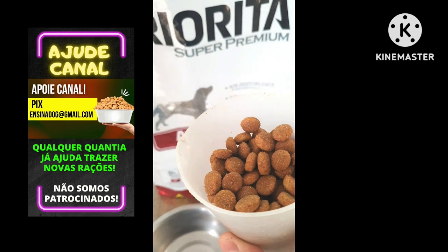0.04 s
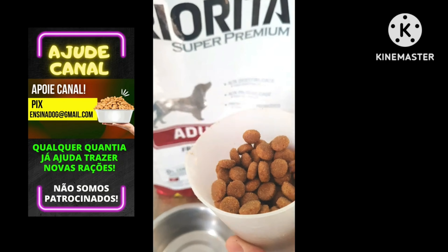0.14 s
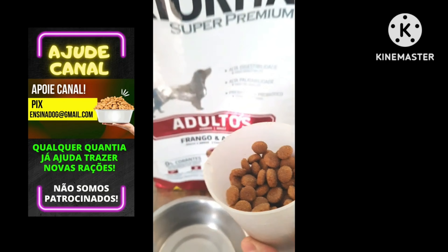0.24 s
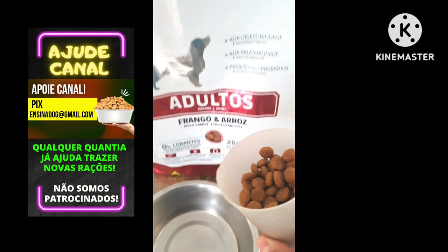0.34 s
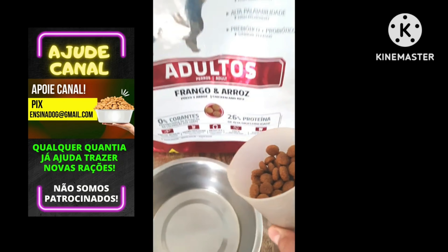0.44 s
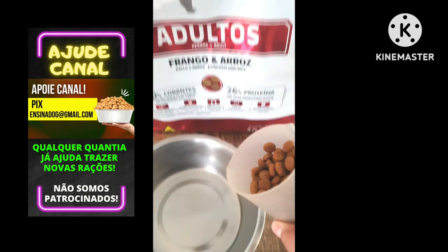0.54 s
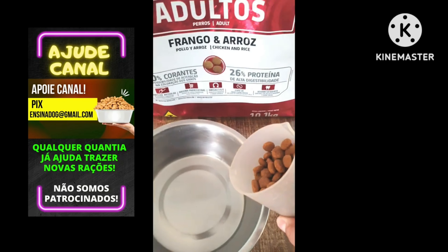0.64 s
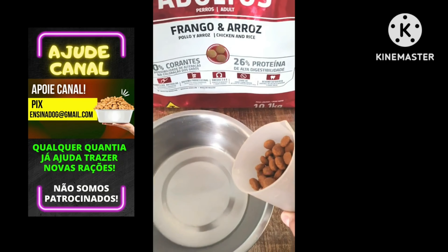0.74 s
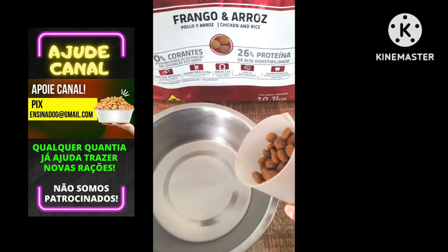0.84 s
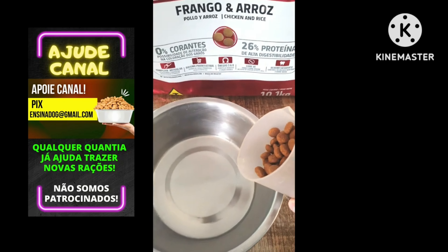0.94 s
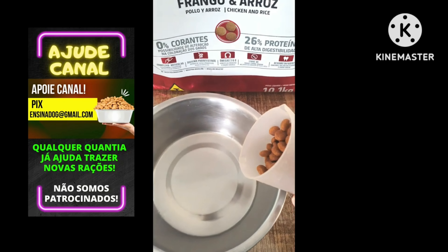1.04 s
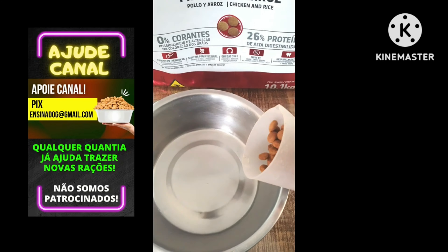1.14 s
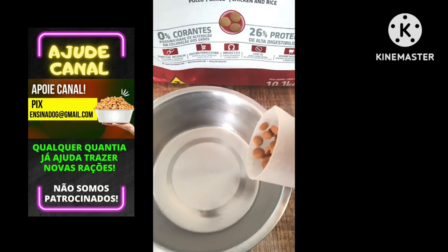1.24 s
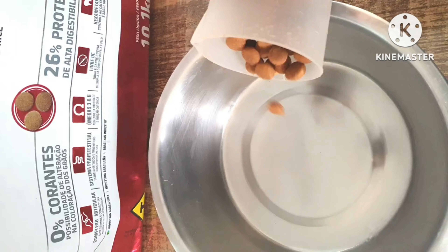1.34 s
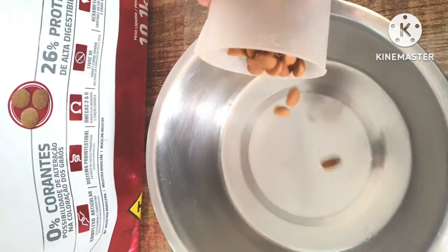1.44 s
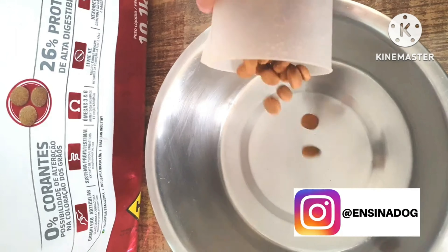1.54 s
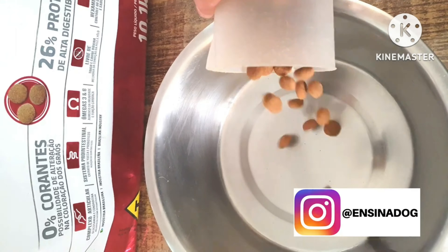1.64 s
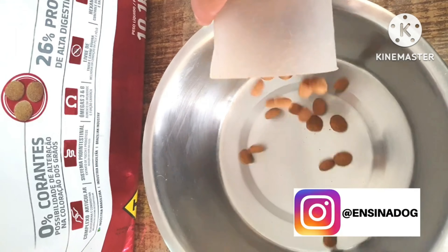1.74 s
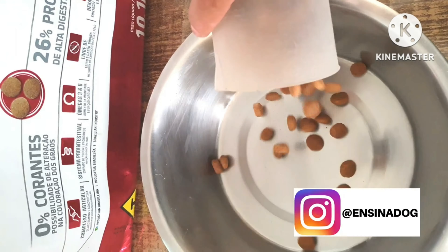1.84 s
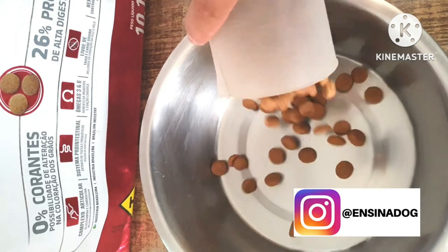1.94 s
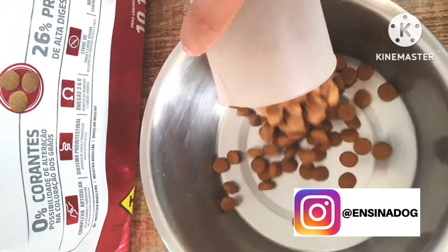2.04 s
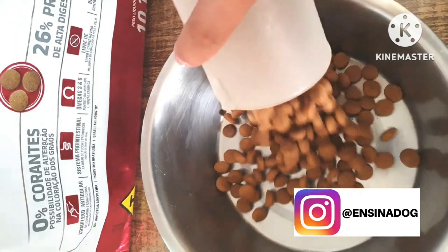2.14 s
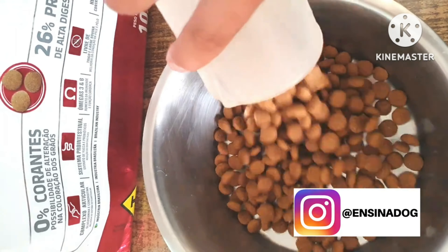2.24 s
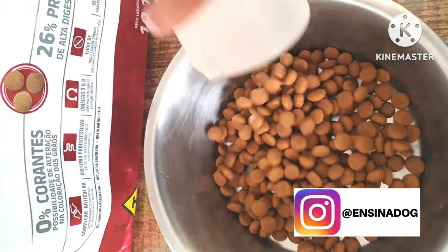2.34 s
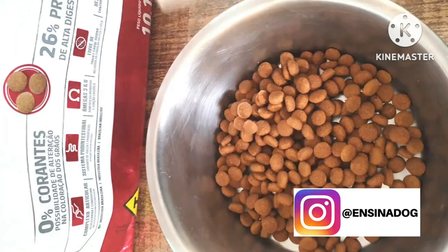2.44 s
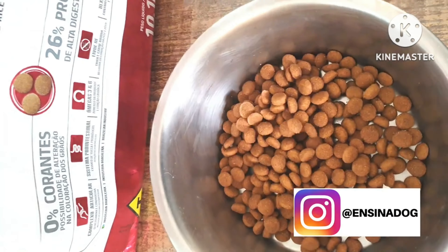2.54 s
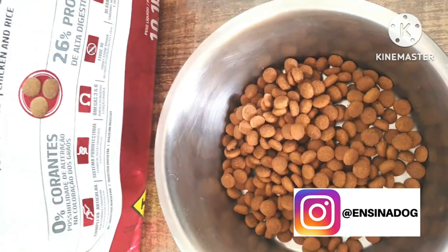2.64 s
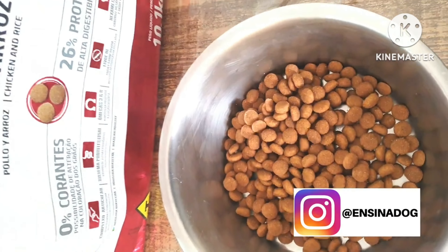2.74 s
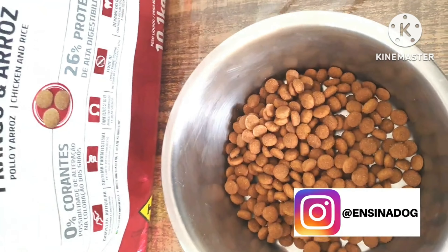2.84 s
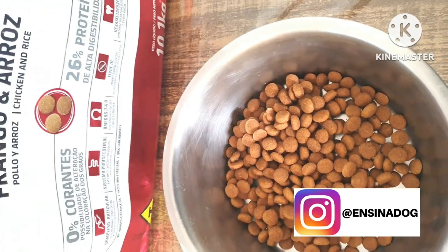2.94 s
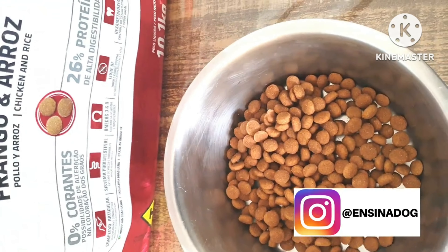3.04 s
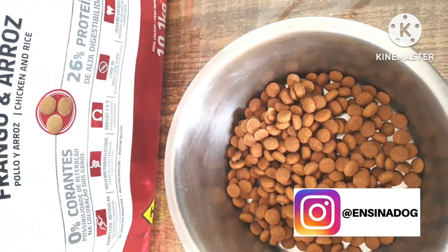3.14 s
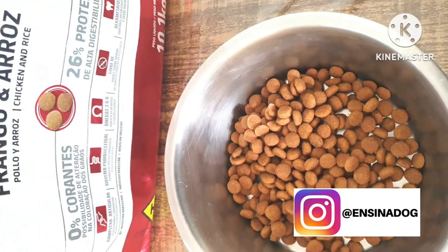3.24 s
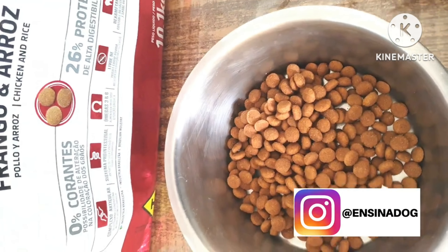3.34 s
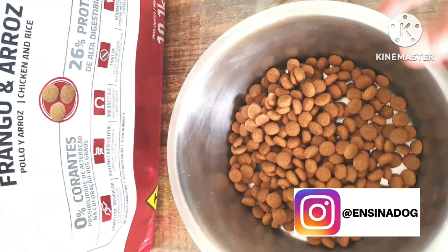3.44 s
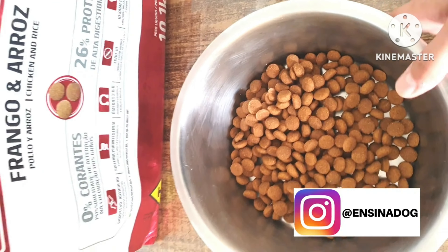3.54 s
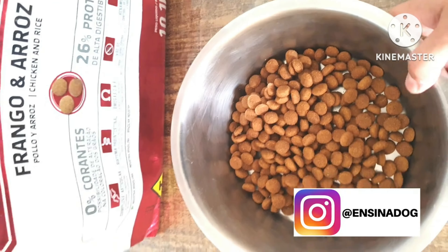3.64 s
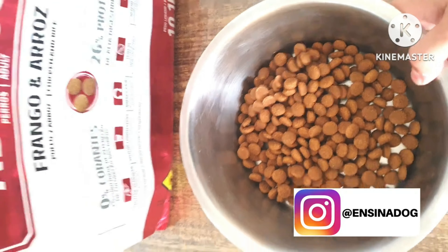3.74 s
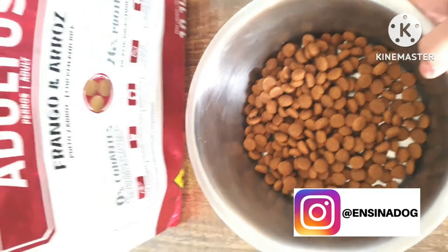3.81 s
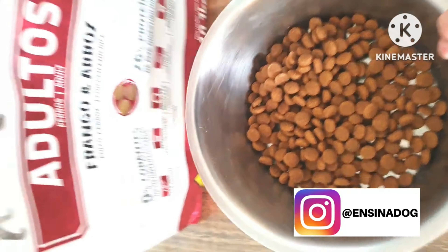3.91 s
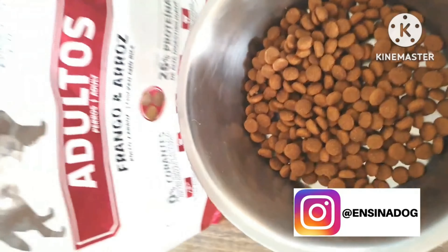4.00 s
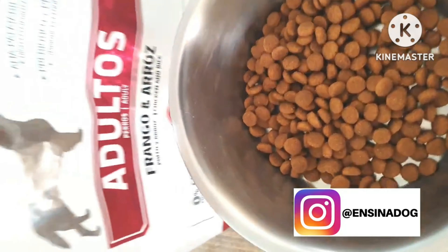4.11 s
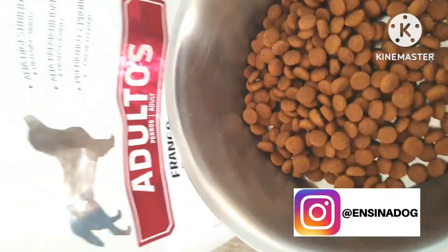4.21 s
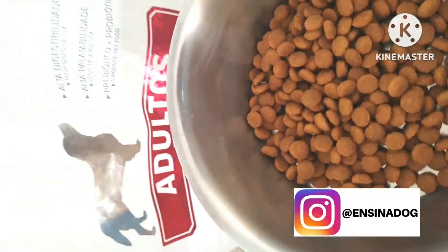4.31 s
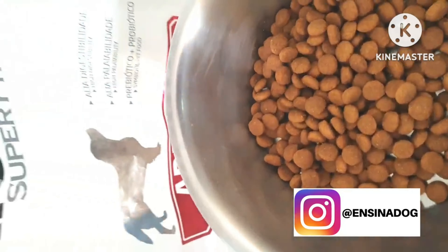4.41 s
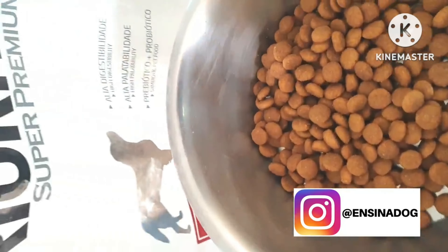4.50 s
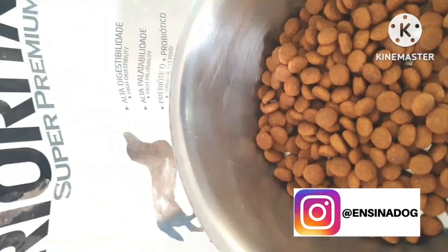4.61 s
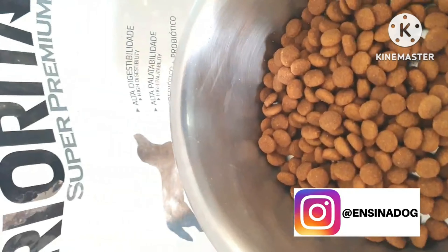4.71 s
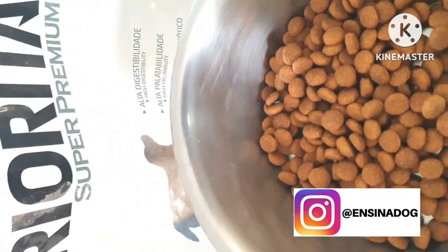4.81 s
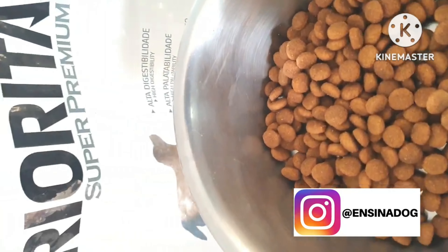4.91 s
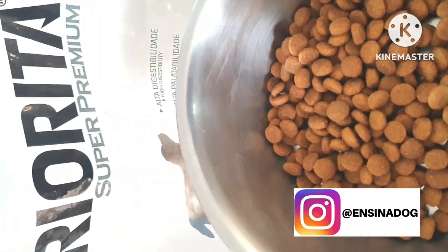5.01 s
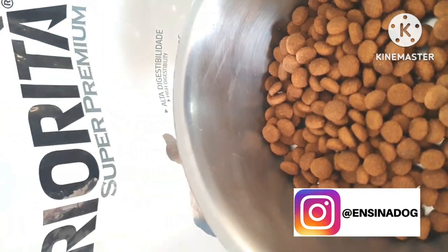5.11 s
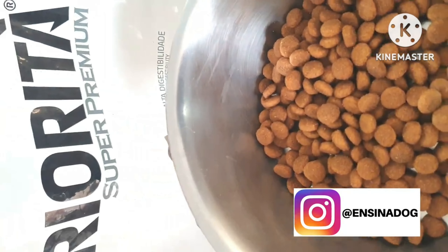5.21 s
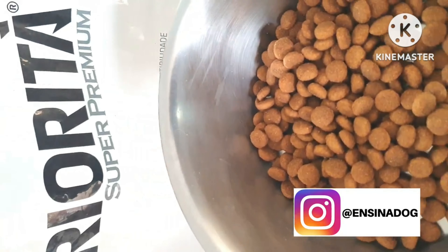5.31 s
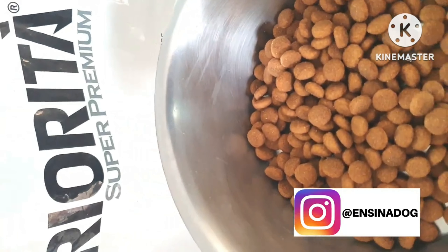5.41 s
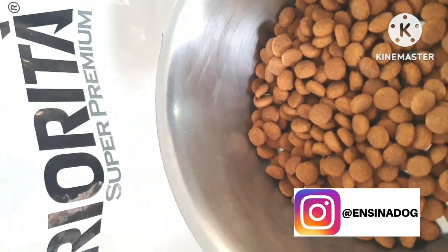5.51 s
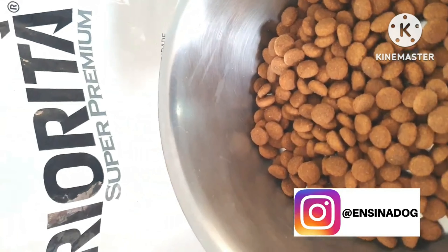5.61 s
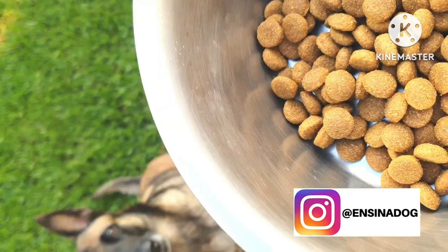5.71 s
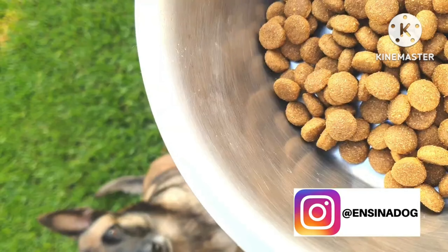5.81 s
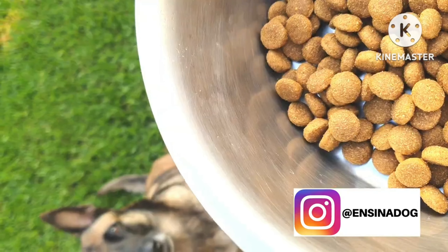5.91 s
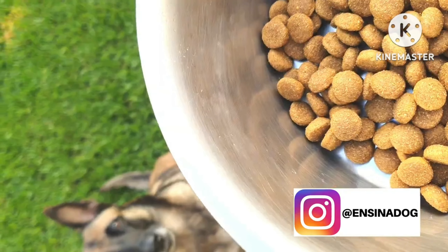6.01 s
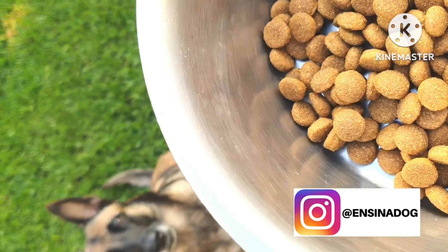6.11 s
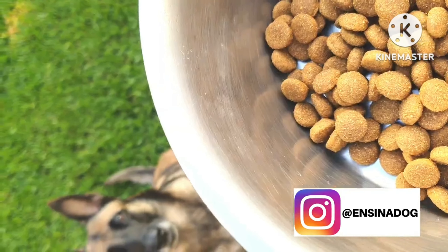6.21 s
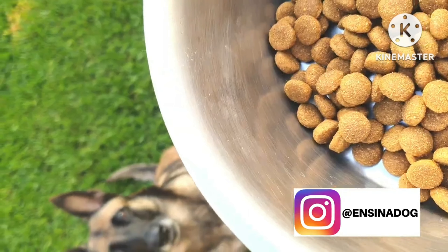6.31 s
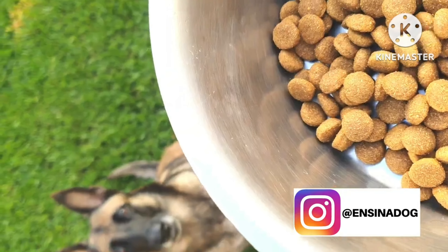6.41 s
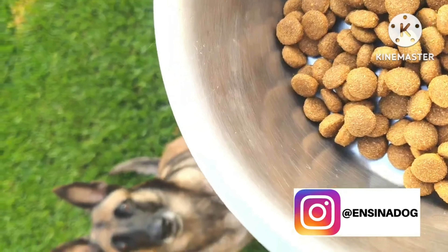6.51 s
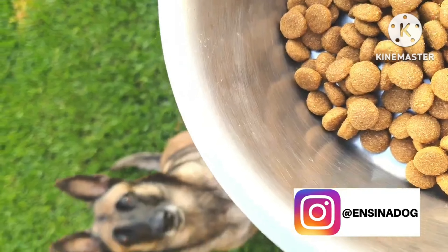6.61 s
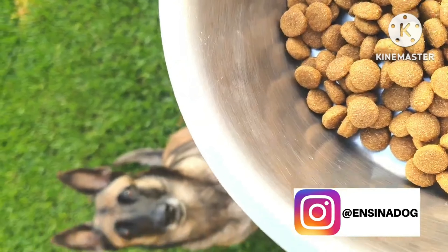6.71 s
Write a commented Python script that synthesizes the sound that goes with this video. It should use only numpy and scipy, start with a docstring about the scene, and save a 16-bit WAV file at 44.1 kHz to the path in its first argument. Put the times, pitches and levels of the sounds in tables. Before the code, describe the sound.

A sleeve swishes softly at about 0.3 seconds, and fingers start bumping the microphone, making low thumps and rumble on the right side that recur throughout. At 1.4 seconds dry dog food slides and ticks in a plastic scoop. From 1.6 seconds single pellets strike a steel bowl with bright, short, ringing clinks. They thicken into a rattling rush that peaks near 2.2 seconds, clacks on the growing heap and stops around 2.5. The pour is close, with slight room echo, clear on the left and muffled on the right. Two dull, echoing knocks sound a little way off at about 3.1 and 3.4 seconds. Handling bumps cluster from 3.6 to 5.6 seconds, while very faint, hollow tones rise and fall in the distance from 4 seconds on. Around 6.1 seconds, with a small click and two soft bumps, the low room hum changes to quiet garden air.

```python
"""A sleeve swishes, then dry pet food slides from a plastic scoop into a steel bowl. A few single pellets
make the steel ring; a short rush follows and clatters on the growing heap, and the room echoes.
Two dull knocks come next, then faint tones moan far off. At the end the air is a quiet garden's.
All along, the left microphone hears the scene openly; the right one is muffled by the hand that
holds the camera and thumps whenever the fingers shift."""
import sys
import numpy as np
from scipy import signal
from scipy.fft import rfft, irfft, next_fast_len
from scipy.io import wavfile

SR = 44100
rng = np.random.default_rng(int(sys.argv[2]) if len(sys.argv) > 2 else 0)


def wrap_up_sound(samples):
    """Save the sound to the file named by the first command line argument, as 16-bit audio."""
    columns = np.atleast_2d(samples).T
    # keep every value between -1 and 1, then stretch to whole-number steps
    tamed = np.clip(columns, -1, 1)
    steps = np.round(tamed * 32767).astype(np.int16)
    wavfile.write(sys.argv[1], SR, steps)


N = 297654
TIME = np.arange(N) / SR

# Levels in dB are relative. A ring time (t60) is how long a sound takes to fade by 60 dB.
# Single pellets hitting the steel. Each row: start in seconds, level in dB, then the extra
# drum of the bowl's floor, clink of its wall and high snap, each in dB.
SINGLE_PELLETS = [(1.572, -15, -3, 2.5, 3), (1.649, -15.5, -2, 0, 3), (1.688, -18.5, -4.5, 10, -6.5),
                  (1.699, -17.5, -2, 7.5, 3.5), (1.783, -14.5, -1, 1.5, 3.5), (1.827, -16.5, -0.5, 3, -2),
                  (1.852, -17.5, -4.5, -1, 1.5), (1.865, -17.5, 6, 1, -3), (1.91, -21.5, 4, 0.5, -3),
                  (1.952, -20, 3.5, 5, -10.5), (1.972, -18, -5, 0, 4.5), (1.998, -23, 4.5, -2, -0.5),
                  (2.014, -18.5, 2.5, 0.5, 4), (2.026, -20, -1.5, 0, 0), (2.067, -18, 0, 1, -1.5),
                  (2.091, -17, 1.5, -2, 3.5), (2.124, -16.5, 3.5, -0.5, 6.5), (2.214, -22.5, -0.5, 2, 10),
                  (2.358, -19.5, 1, 7, 0), (2.445, -31, 10, -12, -7)]
# The bowl's clear tones. Each row: pitch in Hz, level in dB, ring time in seconds.
BOWL_TONES = [(842, -13.5, 0.27), (1037, -3.5, 0.12), (1147, 6.5, 0.069), (1203, 1, 0.13), (1356, -8, .2),
              (1450, -7, 0.2483), (2132, -8.5, 0.37), (2450, 1, 0.067), (2476, 2, 0.087), (2550, -5, 0.1),
              (2806, -9, 0.15), (2932, -11, 0.22), (3320, -5.5, .18), (3770, -10, 0.4), (4250, -11, 0.072),
              (4820, -5, 0.16), (7840, -12, 0.1902), (8060, -15.5, 0.12), (8406, -17, .08),
              (8900, -13.5, 0.14)]
# The wooden table's low tones. Each row: pitch in Hz, level in dB, ring time in seconds.
WOOD_TONES = [(131, -24.5, 1.5), (251.7, -29, .9)]
# Pellets slipping in the scoop. Each row: start in seconds, level in dB.
SCOOP_SLIPS = [(1.359, -27), (1.409, -34.5), (1.431, -24.5), (1.443, -34), (1.459, -33.5), (1.503, -31)]
# Fingers shifting. Each row: start in seconds, thud in dB, tap in dB, tap sharpness (1 is usual).
FINGER_BUMPS = [(0.352, -8.5, -13, 1.16), (0.495, -40, -26, 1.03), (0.556, -17, -57, 0.59),
                (0.823, -13.5, -27.5, 0.78), (0.964, -11, -22, 1.15), (1.07, -15.5, -23.5, 1.1),
                (1.327, -13, -26, 1.08), (1.405, -19.5, -28.5, 1), (1.632, -16, -27, 1.12),
                (1.997, -22, -22, 1.1), (2.122, -14, -24.5, 1.28), (2.821, -32, -55, .7),
                (3.608, -17.5, -26, 1.13), (3.738, -31, -30, 0.71), (3.867, -24, -29, 0.9),
                (3.972, -20.5, -30.5, 0.97), (4.006, -24, -28.5, 1.02), (4.128, -20, -29.5, 1.38),
                (4.231, -22, -27.5, 1.1), (4.282, -19, -26, .9), (4.308, -18, -22, 1.08),
                (4.427, -19.5, -27.5, 1.05), (4.631, -22, -31, 1.3), (4.7, -19, -30.5, 1.3),
                (4.904, -23, -29.5, 1.07), (5.187, -13.5, -28.5, 1.39), (5.217, -25, -31.5, 1.16),
                (5.572, -10.5, -24.5, 1.45), (6.057, -19, -43, 1.04), (6.169, -18.5, -39.5, 1.05)]
# The camera moving. Each row: start and end in seconds, then the grip's rumble, the rumble at
# the open microphone and the brushing, each in dB.
CAMERA_MOVES = [(0.3, 0.588, -31, -45, -78), (.7, 1.45, -39.5, -47, -72.5),
                (3.58, 4.653, -38.5, -44.5, -77), (4.945, 5.299, -39, -61.5, -78),
                (5.958, 6.518, -37, -78, -91)]
# Knocks in the room. Each row: start in seconds, level in dB, echo in dB, then the ringing tone's
# pitch in Hz, ring time in seconds and level in dB, and last the blow's spectrum.
ROOM_KNOCKS = [(3.059, -28.5, 5.5, 549.6, 0.35, -8, [(80, -13.5), (160, -14), (250, 3.5), (380, -12),
               (560, 6.5), (660, -9), (800, -12), (1000, -12.5), (1150, -19), (1450, -38.5), (2200, -67),
               (6000, -83)]), (3.445, -28, -2, 804, 0.13, -16, [(100, 2), (250, -1.5), (400, -14),
               (600, -5.5), (800, -1.5), (950, -7), (1300, -9), (1600, -13), (2200, -19), (3000, -31),
               (6000, -54)])]
# Hand and bag rustles. Each row: start and length in seconds, level in dB, centre in Hz,
# width in octaves.
LIGHT_RUSTLES = [(0.002, 0.18, -69.5, 4500, 1), (0.851, 0.054, -65, 1530, 0.4),
                 (0.844, 0.055, -73, 3460, 0.3), (1.201, 0.13, -67.5, 1360, 0.85),
                 (3.619, 0.16, -68, 7640, 0.28), (3.794, 0.16, -66.5, 3020, 0.68),
                 (3.789, 0.12, -67.5, 8400, 0.36), (4.108, 0.095, -72, 2073, 0.44)]
# Far-off moans. Each row: start and length in seconds, level in dB, top pitch in Hz, overtones in dB.
FAR_MOANS = [(4.033, 0.39, -62, 615, -37), (4.58, 0.51, -61.5, 593, -44), (5.528, 0.56, -68.5, 613, -38.5),
             (6.428, 0.49, -62, 567, -14.5)]
# A moan's overtones. Each row: multiple of the pitch, level in dB.
MOAN_OVERTONES = [(1.8, 3.5), (2.95, -5.5)]
# How long the room echoes. Each row: frequency in Hz, ring time in seconds.
ROOM_RING_TIMES = [(150, .7), (600, 0.95), (1200, 0.6), (3600, .7), (5200, .54), (9000, .46), (14000, 0.79)]

# A spectrum says how strong a sound's lows and highs are. Each row: frequency in Hz, level in dB.
STEEL_SPECTRUM = [(130, -13.5), (400, -17.5), (650, -11), (820, -1), (930, -8), (1130, 4.5), (1750, -8),
                  (2250, -5), (2600, -1.5), (3300, -6), (4800, -10), (6800, -15.5), (8400, -12),
                  (14500, -32)]  # the bowl's thin metal
HEAP_SPECTRUM = [(130, -6.5), (450, -12), (800, -6), (1250, 4), (1900, -2.5), (2700, -13), (4800, -15),
                 (6800, -25.5), (8400, -16.5), (11000, -41.5), (15000, -33)]  # a pellet landing on other pellets
GRIT_SPECTRUM = [(1000, -22), (3000, -9), (6500, -7.5), (8400, -0.5), (11000, -6.5), (15000, -15)]  # pellets grazing each other
SCOOP_SPECTRUM = [(300, -10.5), (800, 0.5), (1400, -1), (2200, -4), (5000, -11), (7000, -18.5),
                  (9000, -16.5), (14000, -31.5)]  # a pellet ticking on plastic
THUD_SPECTRUM = [(18, -30.5), (30, -12.5), (45, -3), (62, 5), (88, 0.5), (125, -16.5), (250, -53),
                 (1000, -88.5)]  # the camera's case rocking
TAP_SPECTRUM = [(40, -29), (150, 8), (230, 4), (400, -10), (600, -27), (850, -43.5), (1300, -60),
                (4500, -67), (12000, -77.5)]  # a finger tapping the case
SKIN_SPECTRUM = [(60, -10.5), (150, 11.5), (400, -6), (650, -12.5), (900, -28), (1500, -36.5), (4000, -47),
                 (12000, -64.5)]  # skin dragging over the case
GRIP_SPECTRUM = [(20, -11), (45, -2), (75, -1.5), (110, -11.5), (160, -22), (300, -40), (700, -59),
                 (2500, -69.5), (10000, -89.5)]  # the gripping hand's rumble
SLEEVE_SPECTRUM = [(100, -9), (200, 2.5), (500, -5.5), (1400, -16.5), (2100, -11.5), (2800, -15.5),
                   (3700, -13), (4500, -14.5), (5500, -10), (7000, -26), (10000, -24.5), (14000, -40.5)]  # cloth swishing
BRUSH_SPECTRUM = [(400, -5.5), (1400, 1), (3500, -4.5), (5200, -6), (7000, -12.5), (8500, 1), (10500, -9),
                  (15000, -11)]  # the hand brushing the case
INDOOR_SPECTRUM = [(60, -1.5), (160, 3), (300, -6.5), (450, -13.5), (700, -26), (1200, -29.5),
                   (2500, -37.5), (5000, -42.5), (7000, -48), (8500, -42.5), (11000, -45), (15000, -44.5)]  # the room's air
GARDEN_SPECTRUM = [(25, -14), (80, -27), (160, -27), (350, -2.5), (700, -13), (1200, -16), (2500, -25),
                   (6000, -34), (15000, -38)]  # the garden's air
RUMBLE_SPECTRUM = [(20, -13), (45, -8.5), (72, 0.5), (110, -21.5), (300, -48.5), (1000, -81.5)]  # deep rumble of the room and the moving camera
COVERED_SPECTRUM = [(60, -5), (200, -8.5), (500, -15), (900, -22), (1800, -26.5), (3200, -22), (4800, -26),
                    (7500, -41.5), (15000, -34)]  # what gets through the hand to the right microphone
CLICK_SPECTRUM = [(100, 2.0), (400, 3), (1200, -8.0), (4000, -21), (15000, -29.5)]
HISS_SPECTRUM = [(500, -11.5), (2500, -3.5), (7000, -11), (15000, -13.5)]

FIRST_S, FULLEST_S, EMPTY_S = 1.58, 2.16, 2.465  # the flow starts, peaks and runs out
FORCE_POWER = 1.7  # a thicker flow lands harder
TOP_HZ = 15500  # upper limit of the treble


def pour(spot_spread_db=3.5, spots=48, single_db=2.5, rebound_s=.003, rebound_db=-5.5):
    """Single pellets land on an edge, then slap flat on the bare steel; the stream joins them."""
    starts, levels, *tone_db = np.transpose(SINGLE_PELLETS)
    stream_tone_db = spot_spread_db * rng.standard_normal((len(tone_db), spots))
    rings = bowl_rings(*np.hstack([stream_tone_db, tone_db, tone_db]))
    stream_rings, edge_rings, flat_rings = np.split(rings, [spots, spots + len(starts)])
    out = np.zeros(N)
    for start, db, edge, flat in zip(starts, levels, edge_rings, flat_rings):
        add(out, start, amp(db + single_db) * edge)
        add(out, start + rebound_s, amp(db + single_db + rebound_db) * flat)
    return out + stream(stream_rings)


def stream(rings, peak_per_s=450, db=-18, spread_db=4, final_heap_share=.65, heap_power=2.3):
    """Rushing pellets ring the steel; as the bowl fills, more of them clack on the heap instead."""
    thickness = flow()
    fallen = np.cumsum(peak_per_s * thickness) / SR
    delay, force, target, place = rng.random((1500, 4))[:int(fallen[-1])].T
    landings = np.searchsorted(fallen, np.arange(len(delay)) + delay)
    weights = unit(amp(spread_db * np.minimum(-np.log(1 - force), 3)))  # most land lightly, a few hard
    weights *= amp(db) * thickness[landings] ** FORCE_POWER * np.sqrt(SR / peak_per_s)
    on_heap = target < final_heap_share * (fallen[landings] / fallen[-1]) ** heap_power
    clacks = [clack(HEAP_SPECTRUM, t60=.019) for _ in rings]
    spots = (place * len(rings)).astype(int)
    out = np.zeros(N)
    for landing, weight, hits_heap, spot in zip(landings, weights, on_heap, spots):
        sound = clacks[spot] if hits_heap else rings[spot]
        add(out, landing / SR, weight * sound / np.linalg.norm(sound))
    return out


def flow(swell_s=.235, ebb_s=.28, stop_s=.036):
    """How thickly pellets leave the scoop, from 0 to 1: it swells, ebbs and stops when empty."""
    width = np.where(TIME < FULLEST_S, swell_s, ebb_s)
    bell = np.exp(-.5 * ((TIME - FULLEST_S) / width) ** 2)
    return bell * (TIME > FIRST_S) * np.exp(-np.maximum(TIME - EMPTY_S, 0) / stop_s)


def bowl_rings(drum_db, clink_db, snap_db, clear_db=4, clink_hz=2510, detune=.004, count=520):
    """One ring of the bowl per hit: each spot stirs the same tones in its own mix."""
    t = np.arange(15000) / SR
    # thin steel has a crowd of tones that die fast; a few clear ones stand out
    crowd_hz = (np.arange(count) + rng.random(count) + 4) * TOP_HZ / (count + 4)
    crowd_fade = dying(t, t60=.087) + .078 * dying(t, t60=.28)
    crowd = amp(read(STEEL_SPECTRUM, crowd_hz))[:, None] * crowd_fade
    clear_hz, tone_db, t60 = np.transpose(BOWL_TONES)
    clear = amp(tone_db + clear_db)[:, None] * dying(t, t60[:, None])
    hz = np.r_[crowd_hz, clear_hz]
    tones = np.r_[crowd, clear] * np.sin(2 * np.pi * (hz[:, None] * t + rng.random((len(hz), 1))))
    shape = (len(drum_db), len(hz))
    spot_gain = rng.uniform(.26, 2.9, shape) * rng.choice([-1, 1], shape)
    drum = 1 / (1 + (hz / 1700) ** 6)
    snap = 1 / (1 + (4000 / hz) ** 6)
    clink = np.exp(-.5 * (np.log2(hz / clink_hz) / .14) ** 2)
    boost_db = np.outer(drum_db, drum) + np.outer(clink_db, clink) + np.outer(snap_db, snap)
    rings = (spot_gain * amp(boost_db)) @ tones
    # pellets lying on the steel shift its pitch a little from hit to hit
    rings = np.array([np.interp(t * (1 + detune * rng.uniform(-1, 1)), t, ring) for ring in rings])
    first_10_ms = rings[:, :SR // 100]
    return rings / np.sqrt(np.mean(first_10_ms ** 2, axis=1, keepdims=True))


def grit(db=-36, ticks_per_s=900, spread_db=3, settle_db=-27, settle_s=.19):
    """Pellets graze each other with tiny dry ticks as they fall, and briefly as the heap settles."""
    strengths = amp(spread_db * np.minimum(rng.exponential(1, N), 3)) * rng.choice([-1, 1], N)
    ticks = strengths * (rng.random(N) < ticks_per_s / SR)
    crackle = unit(signal.oaconvolve(ticks, clack(GRIT_SPECTRUM, t60=.02))[:N])
    settling = (TIME > EMPTY_S) * np.exp(-np.maximum(TIME - EMPTY_S, 0) / settle_s)
    return amp(db) * (flow() ** FORCE_POWER + amp(settle_db) * settling) * crackle


def tabletop(food):
    """The falling food shakes the wood under the bowl, which hums on at its lowest tones."""
    ring, t = np.zeros(SR), TIME[:SR]
    for hz, db, t60 in WOOD_TONES:
        tone = np.sin(2 * np.pi * hz * t) * dying(t, t60)
        ring += amp(db) * tone / np.linalg.norm(tone)
    return signal.oaconvolve(food, ring)[:N]


def scoop(tick_db=-2, slide_db=-52, slide_start_s=1.355):
    """Pellets slide along the plastic as it tips, ticking against it."""
    out = np.zeros(N)
    add(out, slide_start_s, amp(slide_db) * rub(length_s=.17, hz=1100, octaves=.9))
    for start, db in SCOOP_SLIPS:
        add(out, start, amp(db + tick_db) * clack(SCOOP_SPECTRUM, t60=.04))
    return out


def hand(rest_db=-46.5, tap_boost_db=1, skin_db=-19, drag_s=.004):
    """Fingers tap the case, rock it and drag over it; the grip rumbles, faintly even at rest."""
    out = np.hypot(movement(column=2), amp(rest_db)) * noise(GRIP_SPECTRUM)
    drag = np.zeros(N)
    thud = peak_one(pulse(THUD_SPECTRUM))
    progress = TIME[:SR // 10] / drag_s
    stroke = peak_one(progress ** 2 * np.exp(-progress))  # builds smoothly, then dies
    for start, thud_db, tap_db, sharpness in FINGER_BUMPS:
        tap = peak_one(pulse([(hz * sharpness, db) for hz, db in TAP_SPECTRUM]))
        add(out, start - .002, amp(thud_db) * thud + amp(tap_db + tap_boost_db) * tap)
        add(drag, start, amp((thud_db + tap_db) / 2 + skin_db) * stroke)
    return out + drag * noise(SKIN_SPECTRUM)


def movement(column, ease_in_s=.06, ease_out_s=.18):
    """Loudness over time from one column of the camera's moves: each eases in, holds and dies away."""
    gains = []
    for move in CAMERA_MOVES:
        rise = np.minimum(TIME - move[0], 0) / ease_in_s
        fall = np.maximum(TIME - move[1], 0) / ease_out_s
        gains.append(amp(move[column]) * np.exp(rise - fall))
    return np.max(gains, axis=0)


def knocks(rattle=.44):
    """Dull blows a little way off: one push, a short rattle, one lasting tone and much echo."""
    out, t = np.zeros(N), TIME[:SR]
    for start, db, echo_db, hz, ring_t60, ring_db, spectrum in ROOM_KNOCKS:
        blow = np.zeros(N)
        push = peak_one(pulse(spectrum))
        add(blow, start, amp(db) * (push + rattle * clack(spectrum, t60=.075)))
        out += blow + amp(echo_db) * room(blow, build_s=.016)
        add(out, start, amp(db + ring_db) * np.sin(2 * np.pi * hz * t) * dying(t, ring_t60))
    return out


def click(start_s=6.132, db=-31):
    """One small dry click."""
    out = np.zeros(N)
    add(out, start_s, amp(db) * peak_one(pulse(CLICK_SPECTRUM)))
    return out


def rustles(swish_s=.315, swish_db=-41.5, rise_db_per_s=219, fall_db_per_s=128.5):
    """A sleeve swishes once as the camera draws back; the hand and the bag brush lightly."""
    since = TIME - swish_s
    swish = amp(swish_db + np.minimum(rise_db_per_s * since, -fall_db_per_s * since))
    out = swish * noise(SLEEVE_SPECTRUM) + movement(column=4) * noise(BRUSH_SPECTRUM)
    for start, length, db, hz, octaves in LIGHT_RUSTLES:
        add(out, start, amp(db) * rub(length, hz, octaves))
    return out


def moans(octaves=.082, skew=.82, bend=.1):
    """Hollow far-off tones; loudness and pitch rise and sink together in one arch."""
    out = np.zeros(N)
    for start, length, db, hz, upper_db in FAR_MOANS:
        size = int(length * SR)
        upper = sum(amp(level) * band(ratio * hz, octaves, size) for ratio, level in MOAN_OVERTONES)
        tone = band(hz, octaves, size) + amp(upper_db) * upper
        arch = np.sin(np.pi * np.linspace(0, 1, size) ** skew)
        position = np.cumsum(1 - bend * (1 - arch))  # slower, and so lower, at both ends
        add(out, start, amp(db) * arch * np.interp(position, np.arange(size), tone))
    return out


def ambience(garden_s=6.135, indoor_db=-56, garden_db=-72, rumble_db=-53, drone_hz=376, drone_db=-70):
    """Room rumble and a thin drone, then at 6.135 s the background switches to a quiet garden; moving the
    camera adds rumble."""
    inside = TIME < garden_s
    indoors = amp(indoor_db) * noise(INDOOR_SPECTRUM)
    indoors += amp(drone_db) * band(drone_hz, octaves=.012, size=next_fast_len(N))[:N]
    air = np.where(inside, indoors, amp(garden_db) * noise(GARDEN_SPECTRUM))
    return air + np.hypot(movement(column=3), amp(rumble_db) * inside) * noise(RUMBLE_SPECTRUM)


def room(sound, build_s=.014):
    """Hard walls blur a sound into an echo that builds quickly; each pitch fades at its own pace."""
    hz, t, bands = signal.stft(rng.standard_normal(SR), SR, nperseg=256)
    fade = dying(t, read(ROOM_RING_TIMES, hz)[:, None])
    tail = signal.istft(bands * fade * (1 - np.exp(-t / build_s)), SR, nperseg=256)[1]
    return signal.oaconvolve(sound, tail / np.linalg.norm(tail))[:N]


def clack(spectrum, t60, size=4096):
    """A blow on something with many close tones that die quickly."""
    burst = rng.standard_normal(size) * dying(np.arange(size) / SR, t60)
    return peak_one(colour(burst, spectrum))


def rub(length_s, hz, octaves):
    """A short rub: a band of noise that fades in and out."""
    size = int(length_s * SR)
    return band(hz, octaves, size) * signal.windows.tukey(size, .5)


def band(hz, octaves, size):
    """Noise gathered around one pitch."""
    freqs = np.fft.rfftfreq(size, 1 / SR) + 1
    bell = np.exp(-.5 * (np.log2(freqs / hz) / octaves) ** 2)
    return unit(irfft(rfft(rng.standard_normal(size)) * bell, size))


def noise(spectrum):
    """Steady noise with this spectrum."""
    return unit(colour(rng.standard_normal(N), spectrum))


def colour(sound, spectrum):
    """Filters a sound by a spectrum."""
    return signal.oaconvolve(sound, pulse(spectrum))[:len(sound)]


def pulse(spectrum, size=8192):
    """The tightest single tap that has this spectrum."""
    log_gain = np.log(amp(read(spectrum, abs(np.fft.fftfreq(size, 1 / SR)))))
    return np.fft.ifft(np.exp(np.conj(signal.hilbert(log_gain)))).real[:size // 2]


def read(table, hz):
    """Looks up a frequency in a table, sliding smoothly between its rows."""
    freqs, values = np.transpose(table)
    return np.interp(np.log(hz + 1), np.log(freqs + 1), values)


def dying(t, t60):
    """Fades by 60 dB in t60 seconds."""
    return np.exp(-np.log(1000) * t / t60)


def amp(db):
    """Turns decibels into a gain."""
    return 10 ** (np.asarray(db) / 20)


def unit(x):
    """Scales to an average strength (rms) of 1."""
    return x / np.sqrt(np.mean(x ** 2) + 1e-20)


def peak_one(x):
    """Scales to a peak of 1."""
    return x / abs(x).max()


def add(mix, start_s, sound):
    """Adds a sound to the mix at its start time."""
    part = mix[max(round(start_s * SR), 0):][:len(sound)]
    part += sound[:len(part)]


def scene(room_db=-6.5, covered_room_db=-2, covered_direct_db=-3, leak_db=-50, hiss_db=-84):
    """The open microphone is on the left, the one covered by the hand on the right."""
    food = pour() + grit()
    near = food + tabletop(food) + scoop() + rustles()
    far = knocks() + moans() + ambience()
    touch = hand() + click()
    hiss = amp(hiss_db) * noise(HISS_SPECTRUM)
    left = near + amp(room_db) * room(near) + far + amp(leak_db) * touch
    at_hand = amp(covered_direct_db) * near + amp(covered_room_db) * room(near) + far
    right = colour(at_hand, COVERED_SPECTRUM) + touch + hiss
    return np.array([left, right])


def record(dry):
    """Rounds off the loudest peaks, then cuts the highest treble."""
    rounded = dry / (1 + dry ** 6) ** (1 / 6)
    low_pass = signal.firwin(301, TOP_HZ, window=("kaiser", 9), fs=SR)
    return signal.oaconvolve(rounded, low_pass[None], "same")


dry = scene()
out = record(dry)
wrap_up_sound(out)
```